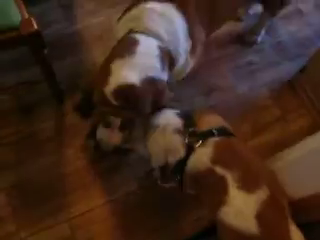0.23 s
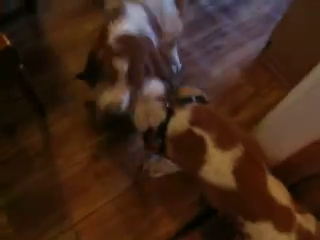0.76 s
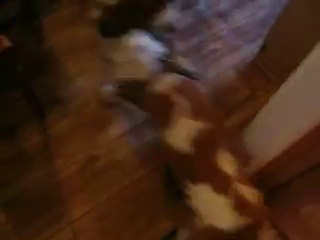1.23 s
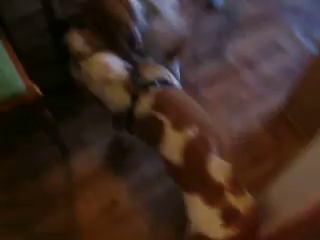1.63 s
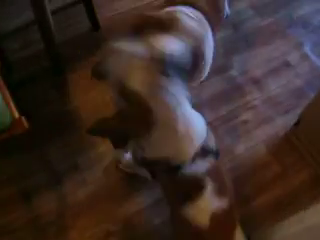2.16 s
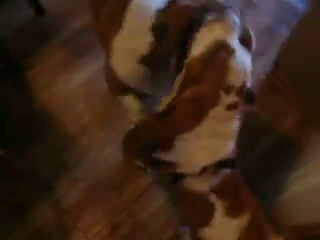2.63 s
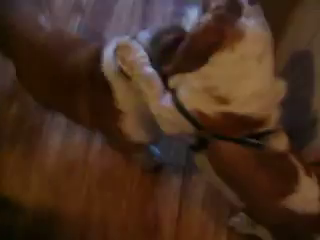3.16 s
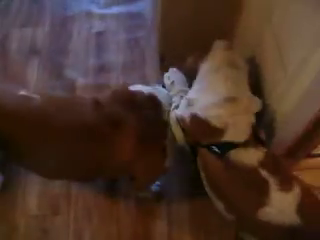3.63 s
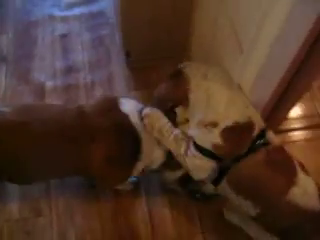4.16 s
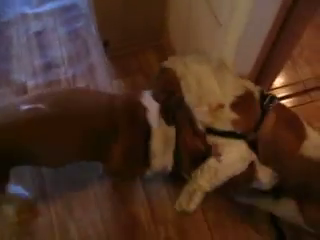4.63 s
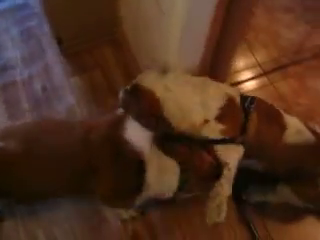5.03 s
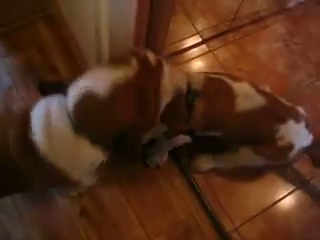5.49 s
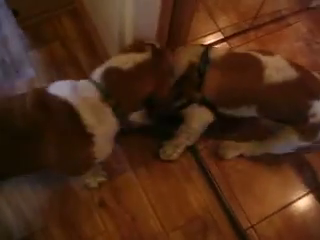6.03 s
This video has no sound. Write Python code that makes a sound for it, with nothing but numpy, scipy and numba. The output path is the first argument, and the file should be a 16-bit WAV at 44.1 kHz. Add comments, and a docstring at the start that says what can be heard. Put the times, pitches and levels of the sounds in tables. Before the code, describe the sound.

Rough, rattling dog growls come in quick bursts, with breathy huffs, sharp snorts, claw ticks and dull thuds in a small room.

```python
"""Growls and grunts in short rough bursts, panting and claw clicks: two large dogs wrestle in a small room.
Voices follow the source-filter principle: uneven pulses and puffs of air excite chest, throat and mouth.
Breath, skids and snorts are filtered noise; grunt onsets, claws and boards are decaying oscillations.
At listed moments the zero line jumps and the room sound ducks, then both creep back.
A dull microphone adds hiss, rounds the peaks and removes the deepest bass and the high treble."""
import sys
import numpy as np
from scipy import signal
from scipy.fft import rfft, irfft, next_fast_len
from scipy.io import wavfile
from scipy.ndimage import uniform_filter1d, map_coordinates
from numba import njit

SR = 44100
rng = np.random.default_rng(int(sys.argv[2]) if len(sys.argv) > 2 else 0)


def int16_out(signal):
    """Quantize to a 16-bit WAV file."""
    q = np.round(np.clip(np.atleast_2d(signal).T, -1, 1) * 32767)
    wavfile.write(sys.argv[1], SR, q.astype(np.int16))


N = 276507  # length in samples

# Effort, one list per growl or grunt. Each row: time in seconds, level in dB, mouth opening as the
# mouth resonance in dB, chest tone in dB; the last two are against the level.
EFFORT = [
    [(0.0, -20.5, 1.5, -2), (0.048, -26, -10.5, -3.5), (0.11, -32, -8.5, -14), (0.12, -32.5, -5, 2)],
    [(0.41, -34, -9.5, -11), (0.426, -20.5, -7, -3.5), (0.452, -15, -7, -3.5), (0.542, -17, -7, -0.5),
     (0.612, -26.5, -11.5, -18), (0.63, -25.5, -4, 2.5)],
    [(1.36, -32, 5, -15), (1.37, -26, -11, -7.5), (1.39, -23.5, 5, -5), (1.432, -19, -1.5, -7.5),
     (1.52, -28.5, -6.5, -13.5)],
    [(1.64, -32, -17, 7), (1.658, -29, -16, -3.5), (1.764, -19.5, -13.5, -0.5), (1.808, -27, -10.5, -7.5),
     (1.972, -19, -16.5, -1), (2.1, -26, -3.5, -11)],
    [(2.135, -26.5, -16, 1), (2.153, -18, -11, -3), (2.197, -22, -24.5, -15), (2.215, -28.5, -10, -1),
     (2.239, -27.5, -13, -14), (2.26, -33, -22, -11)],
    [(2.4, -31, -22, -2), (2.414, -23.5, -16, 0.5), (2.47, -22.5, -21, -7), (2.504, -31, -25, 2.5),
     (2.51, -31.5, -20.5, -8)],
    [(2.62, -27.5, -14, 3), (2.662, -16, -14.5, -8), (2.75, -17.5, -13.5, -1.5), (2.806, -14.5, -6.5, -4),
     (2.914, -23.5, -3.5, -6.5), (2.92, -30, -16, -11)],
    [(2.94, -23.5, -10.5, -11), (2.952, -23, -3, -5.5), (3.05, -20.5, -1.5, -13), (3.092, -21.5, -8, -9.5),
     (3.146, -27.5, -6, -15), (3.17, -30, -11, -3)],
    [(3.345, -30, -5, -7), (3.367, -18, -12, -4.5), (3.447, -13, -18, -3.5), (3.539, -16, -20, 2.5),
     (3.611, -16, -10, -2.5), (3.79, -24, -6.5, -7.5)],
    [(4.1, -29, -29, -4.5), (4.12, -17.5, -12.5, -3), (4.158, -15.5, -2, -9), (4.254, -20.5, -4, -0.5),
     (4.268, -14.5, -17.5, -7.5), (4.34, -29.5, -8, -9.5)],
    [(4.55, -27.5, -18, -10), (4.582, -19, -4, -3.5), (4.656, -16.5, -4.5, -13.5), (4.668, -21, 0, -3),
     (4.744, -18, -5, -8.5), (4.81, -31.5, -6, -5)],
    [(5.01, -26.5, -3, -19), (5.02, -18.5, -9, -10), (5.068, -16, -6, -6), (5.204, -22, -6.5, -8.5),
     (5.224, -22.5, -4.5, -20), (5.25, -30, 7, -11)],
    [(5.475, -28.5, -15, 4), (5.497, -16.5, -39, -4.5), (5.573, -16, -13.5, -4.5),
     (5.605, -12.5, -24.5, -0.5), (5.673, -23, -9, 1.5), (5.73, -20.5, -18.5, -19)],
    [(5.77, -23, -18.5, 3), (5.792, -23.5, -22.5, -4), (5.814, -18, -19, -7), (5.89, -23.5, -29, -9),
     (5.9, -26.5, -24, -9)],
    [(5.92, -25, -14.5, -4), (5.964, -30.5, -31, -1.5), (6.03, -26, -8, -4.5), (6.042, -33, -27, 7),
     (6.078, -24.5, -22.5, -5), (6.13, -29.5, -16.5, -19)],
]
# Voice of each growl, in the order of EFFORT. Each row: fold rate in Hz before breaks and jitter, roughness at
# full effort (0-1), room modes in dB and throat in dB at the reference chest tone, throat in Hz and rasp in dB
# at the reference opening, each named after its centre: the columns run fold rate, roughness, room-mode dB,
# throat dB, throat Hz, mouth Hz, rasp dB, first rasp resonance in Hz, muzzle in Hz; all centres but the mouth's
# then wander.
VOICES = [(84.24, .5, -5.5, -6, 473, 725, -9, 1820, 3700),
          (65.6, .45, -8.5, -4, 400, 990, -16.5, 1840, 4550),
          (68.37, .6, -18, -9, 580, 840, -12.5, 1680, 3760),
          (105.12, .3, -6.5, -5.5, 535, 800, -14.5, 1625, 3600),
          (101.36, .5, -21.5, -2.5, 493, 830, -22, 2600, 4100),
          (84.34, .45, -10, -4.5, 433, 960, -8.5, 690, 1700),
          (104.5, .35, -10.5, -2.5, 490, 802, -17.5, 1700, 4100),
          (102.55, .6, -8.5, -8, 620, 757, -16.5, 2100, 4300),
          (66.26, .22, -6.5, -8.5, 513, 696, -15, 1655, 3370),
          (67.6, 0.2, -6, -3.5, 490, 710, -12.5, 1730, 3713),
          (66.64, 0.9, -14.5, -3.5, 380, 830, -13.5, 1960, 3850),
          (66.7, .3, -4.5, -7.5, 568, 800, -19.5, 1900, 4700),
          (105.8, .22, -17, -5, 486.5, 890, -16, 1757, 3720),
          (67.06, .45, -10.5, -4, 466, 980, -15, 2400, 3540),
          (104.8, .4, -3.5, -6, 473, 1300, -15, 3300, 2600)]
# Low resonances of chest and room. Each row: centre in Hz, width in Hz, relative gain in dB.
CHEST = [(66.3, 20, 3.5), (106.4, 143, 6.5), (163, 200, 2)]
# Low modes of the small room that colour the voices. Each row: centre in Hz, width in Hz, relative gain in dB.
ROOM_MODES = [(195, 26, -1), (258, 30, 4), (345, 59, -1)]
# Upper resonances. Each row: centre as a multiple of the first rasp resonance, width of the first
# filter pass in Hz, mean gain in dB.
RASP = [(1.002, 133, 15), (1.361, 163.3, 12), (1.759, 252, 9), (2.399, 2510, 11.5)]
OPENING_REF_DB, RASP_DB_PER_DB, THROAT_HZ_PER_DB = -7, 0.32, 5  # opening brings rasp and a higher throat
CHEST_REF_DB, THROAT_YIELDS = -9, 0.27  # dB of throat and room modes lost per dB of chest tone over the reference
ROUGH_PER_DB = .02  # the folds slap less evenly below full effort
MUZZLE_DB = -13  # mean level of a narrow muzzle resonance, against the rasp
WANDER = .065  # tongue and jaw shift the resonances by about this share


def growls():
    """Source-filter principle: uneven fold slaps and puffs of air excite chest, throat and mouth, coloured by
    room modes."""
    gate, level_db, mouth_db, chest_db = curves(EFFORT)
    (hz, rough, modes_db, throat_db, throat_hz, mouth_hz,
     rasp_db, rasp_hz, muzzle_hz) = each(VOICES, EFFORT)
    full_db, = each([[np.max(table, axis=0)[1]] for table in EFFORT], EFFORT)
    rough = np.clip(rough + ROUGH_PER_DB * (full_db - level_db), .1, .8)

    opening = mouth_db - OPENING_REF_DB
    rasp_db = rasp_db + RASP_DB_PER_DB * opening
    yielded_db = THROAT_YIELDS * (chest_db - CHEST_REF_DB)
    throat_db = throat_db - yielded_db
    modes_db = modes_db - yielded_db
    throat_hz = throat_hz + THROAT_HZ_PER_DB * opening
    throat_hz, rasp_hz, muzzle_hz = [
        centre * (1 + WANDER * wobble(9)) for centre in (throat_hz, rasp_hz, muzzle_hz)]

    cycles = np.cumsum(fold_rate(hz) * (1 + .13 * rough * wobble(90))) / SR
    # slaps differ in size, and every second one tends to be weaker
    alternation = (-1) ** np.floor(cycles)
    slap_db = 7 * rough * wobble(110) + 4 * rough * alternation
    slaps = np.diff(np.floor(cycles), prepend=0) * amp(slap_db)
    # air rushes hardest once a cycle
    rush = .5 + np.exp(-3 * (cycles % 1))
    puffs = steady(rush * amp(2 * wobble(120)) * rng.standard_normal(N))
    source = np.sqrt(1 - rough) * steady(slaps) + np.sqrt(rough) * puffs

    sway = 7 * (1 - rough) ** 3 * np.cos(2 * np.pi * cycles)  # the chest wall follows even folds
    rumble = steady(filtered(source, lambda f: resonances(CHEST)(f) / (1 + 1j * f / 150) ** 2))
    chest = steady(rumble + sway)
    modal = steady(filtered(source, lambda f: resonances(ROOM_MODES)(f) / (1 + 1j * f / 300) ** 2))
    throat = cavity(source, throat_hz, width_hz=165)
    mouth = cavity(source, mouth_hz, width_hz=170)

    hiss = 0.41 * source + puffs
    muzzle = amp(MUZZLE_DB + 4 * wobble(30)) * cavity(hiss, muzzle_hz, width_hz=380)
    # tongue and lips move, so each upper resonance flickers on its own
    upper = sum(amp(db + 1.8 * wobble(30)) * cavity(hiss, multiple * rasp_hz, width)
                for multiple, width, db in RASP)
    rasp = muzzle + steady(upper)
    voice = (amp(chest_db) * chest + amp(modes_db) * modal + amp(throat_db) * throat
             + amp(mouth_db) * mouth + amp(rasp_db) * rasp)
    return gate * amp(level_db) * voice


# Shifts of the voice in mid growl. Each row: time in seconds, shift in Hz, half-width of the glide in seconds.
BREAKS = [(1.852, -18, .04), (2.815, -17, .02), (3.44, 36, 0.0042), (3.55, -8, 0.035), (5.57, -8, 0.044)]


def fold_rate(hz):
    """Register break: the fold rate glides to a shifted value and stays there until the next growl."""
    t = np.arange(N) / SR
    for s, shift_hz, width in BREAKS:
        end = min(table[0][0] for table in EFFORT if table[0][0] > s) - .01
        hz = hz + shift_hz * (t < end) * (1 + np.tanh((t - s) / width)) / 2
    return hz


# Hard slaps in the grunts. Each row: start in seconds, level in dB before the onset ramp, ring in Hz.
BURSTS = [(1.373, -12.5, 940), (1.699, -14, 573), (2.151, -7.5, 582), (2.416, -10, 408), (2.666, -11, 506),
          (2.742, -12, 548), (3.45, -8, 674), (4.961, -13, 475), (5.023, -2.5, 898), (5.114, -7, 842),
          (5.798, -7.5, 484)]


def bursts():
    """Impulse response: the closed throat springs open and one strong push rings the mouth briefly."""
    out, t = np.zeros(N + SR), np.arange(SR // 20) / SR
    for s, db, hz in BURSTS:
        decay = amp(db - 60 * t / .04)
        onset = 1 - np.exp(-t / .001)
        out[round(s * SR):][:len(t)] += decay * onset * np.sin(2 * np.pi * hz * t)
    return out[:N]


# Spells of panting and skidding, one list each. Each row: time in seconds, breath in dB, skid in dB.
PANTS = [
    [(0.11, -38, -46), (0.148, -43, -56), (0.206, -47, -58), (0.33, -38.5, -33.5), (0.35, -56, -45),
     (0.42, -41, -34)],
    [(0.62, -28, -31.5), (0.772, -46.5, -42), (0.798, -18, -28.5), (0.814, -15.5, -34.5),
     (0.834, -18.5, -24), (0.84, -47, -42.5)],
    [(0.84, -38.5, -38.5), (0.848, -60.5, -61.5), (0.906, -38, -62), (1.07, -44, -64), (1.08, -45, -44),
     (1.09, -34.5, -60.5)],
    [(1.09, -35, -61), (1.152, -34.5, -34.5), (1.226, -26.5, -34), (1.294, -46, -41), (1.362, -50, -41.5),
     (1.37, -33, -41.5)],
    [(1.51, -27.5, -32), (1.556, -37.5, -43), (1.586, -36, -51), (1.596, -42.5, -43.5), (1.626, -36, -51),
     (1.65, -37.5, -35.5)],
    [(2.09, -48, -37), (2.108, -45.5, -41), (2.132, -33.5, -43.5), (2.14, -27.5, -47)],
    [(2.25, -35, -50), (2.264, -38, -61), (2.312, -39.5, -58), (2.32, -33, -38), (2.354, -46, -63),
     (2.41, -46, -35.5)],
    [(2.5, -36, -60), (2.516, -47, -61), (2.524, -26, -41), (2.532, -28.5, -33), (2.62, -46, -46.5),
     (2.63, -28, -40)],
    [(3.16, -39, -40.5), (3.206, -37, -46), (3.26, -49, -55.5), (3.29, -30.5, -41.5), (3.342, -39.5, -55),
     (3.35, -33, -44)],
    [(3.78, -35.5, -36), (3.888, -39.5, -58), (3.946, -45, -41), (4.038, -63.5, -59.5),
     (4.098, -55.5, -40.5), (4.11, -41, -48)],
    [(4.33, -30.5, -37.5), (4.402, -37, -51.5), (4.462, -38.5, -32.5), (4.476, -31, -32.5),
     (4.542, -25, -32.5), (4.56, -36.5, -33)],
    [(4.8, -29, -42.5), (4.872, -39, -51), (4.892, -25, -33.5), (4.946, -52, -47), (4.958, -23.5, -32),
     (5.02, -29.5, -46.5)],
    [(5.24, -33.5, -31.5), (5.29, -30.5, -43.5), (5.322, -25.5, -38.5), (5.35, -31.5, -45),
     (5.47, -37, -45.5), (5.48, -32, -45.5)],
    [(5.72, -34, -43), (5.758, -34.5, -48.5), (5.762, -35.5, -45), (5.78, -42, -44)],
    [(6.12, -39, -47.5), (6.178, -41, -52), (6.196, -38, -39), (6.202, -31, -60), (6.21, -36, -48),
     (6.27, -35, -46)],
]
# Colour of each spell, in the same order. Each row: thud in dB against the breath, mouth in Hz
# at a breath of -32 dB, skid in Hz.
SPELLS = [(2, 920, 1600), (-4, 740, 1500), (-19, 900, 2200), (-13.5, 855, 1570), (-6, 700, 2440),
          (-12, 760, 1900), (-3.5, 650, 2400), (-4, 710, 2800), (-4.5, 570, 1600), (3, 650, 2360),
          (-6, 690, 1800), (-1, 590, 2300), (-9, 660, 630), (-6, 500, 850), (0, 530, 1540)]
PANT_HZ_PER_DB = 9.5  # a harder breath opens the mouth wider


def pants():
    """Turbulence and friction: fluttering breath through the mouth, paws skidding in grains, body thuds."""
    gate, breath_db, skid_db = curves(PANTS)
    thud_db, mouth_hz, skid_hz = each(SPELLS, PANTS)
    mouth_hz = mouth_hz + PANT_HZ_PER_DB * (breath_db + 32)
    air = amp(3 * wobble(60)) * rng.standard_normal(N)
    grit = amp(3 * wobble(35) + 4 * wobble(600)) * rng.standard_normal(N)
    thud = steady(filtered(rng.standard_normal(N), resonances(CHEST + ROOM_MODES)))
    breath = cavity(air, mouth_hz, width_hz=234)
    skid = cavity(grit, skid_hz, width_hz=1600)
    return gate * (amp(breath_db) * (amp(thud_db) * thud + breath) + amp(skid_db) * skid)


# Snorts and scrapes that start at once and die away. Each row: start in seconds,
# level in dB (6 dB above the initial rms), centre in Hz, t60 in seconds.
SNORTS = [(0.62, -23.5, 2950, 0.3), (1.685, -25.5, 2900, 0.53), (1.7823, -13, 4660, 0.29),
          (2.0194, -13, 4840, 0.35), (2.5255, -24.5, 2790, 0.44), (4.2333, -18.5, 2500, 0.2),
          (5.8055, -26, 4570, 0.58)]


def snorts():
    """Exponential decay of turbulence: grainy broad hiss starts at once and fades."""
    t, level, hz = np.arange(N) / SR, np.zeros(N), np.full(N, 4000.)
    for s, db, centre_hz, t60 in SNORTS:
        level += (t > s) * amp(db - 6 - 60 * np.abs(t - s) / t60)
        hz[t > s] = centre_hz
    grains = amp(1.2 * wobble(130)) * rng.standard_normal(N)
    return level * cavity(grains, hz, width_hz=6600)


# Claws on the floor. Each row: start in seconds, tick in dB, ring in Hz, knock in dB against the tick.
CLAWS = [(0.24, -29.5, 2180, 1.5), (0.4312, -25, 2410, 0), (0.5232, -19, 2516, -2.5),
         (0.619, -20, 2165, -15), (0.7291, -25, 2450, 1), (0.8292, -10, 3027, -8),
         (1.2188, -19.5, 2455, -11), (1.689, -26.5, 2830, -5.5), (1.7585, -12, 3700, -19),
         (1.7852, -5.5, 5050, -20), (2.0205, -20.5, 2204, -0.5), (2.3195, -29, 3080, 1.5),
         (2.4516, -22, 3580, -17), (2.524, -33.5, 2770, -11), (2.9032, -16.5, 2344, 2.5),
         (2.9466, -13.5, 2885, -18), (3.0017, -24, 2530, 3), (3.0485, -16.5, 2280, 6.5),
         (3.1102, -19.5, 2590, 2), (3.1275, -15.5, 2214, -10), (3.693, -11, 2410, -24.5),
         (4.074, -26, 4100, -19.5), (4.4389, -26.5, 2540, -7), (4.6977, -14.5, 2900, 0),
         (4.8877, -21, 2820, -9), (4.9532, -25, 2450, -10), (4.9671, -19, 2580, -13),
         (5.2121, -19.5, 4000, -11), (5.3042, -35, 2650, -16), (5.4508, -28.5, 3000, -15),
         (5.5708, -24, 2325, -10), (5.6473, -21, 2400, -13), (5.6765, -24, 2386, -21),
         (5.8054, -21, 4530, -14), (6.0319, -20.5, 2600, -23), (6.2132, -28, 2540, -16),
         (6.2342, -26.5, 2560, -24)]
BOARD_HZ = 1242


def claws():
    """Impact excitation: each claw gives a short ringing tick with a noisy crack and knocks the board."""
    out, t = np.zeros(N + SR), np.arange(SR // 25) / SR
    for s, db, hz, knock_db in CLAWS:
        scatter = np.cumsum(rng.normal(0, .2, len(t)))  # random phase: the ring is not pure
        tick = amp(-60 * t / .016) * np.sin(2 * np.pi * hz * t + scatter)
        crack = amp(-6 - 60 * t / .008) * rng.standard_normal(len(t))
        knock = amp(knock_db - 60 * t / .03) * np.sin(2 * np.pi * BOARD_HZ * t + scatter / 4)
        out[round(s * SR):][:len(t)] += amp(db) * (tick + knock + crack)
    return out[:N]


# Decay of the room. Each row: frequency in Hz, t60 in seconds.
ROOM = [(100, .22), (800, .27), (5000, .15)]


def room(x):
    """Reverberation by convolution: each frequency of a noise tail dies at its own speed."""
    hz, t, z = signal.stft(rng.standard_normal(SR // 2), SR, nperseg=256)
    t60 = along(ROOM, hz)[:, None]
    tail = signal.istft(z * amp(-60 * t / t60), SR, nperseg=256)[1]
    late = np.pad(x, (250, 0))  # delay in samples
    return signal.fftconvolve(late, tail / np.linalg.norm(tail))[:N]


# Spectrum of the room noise. Each row: frequency in Hz, relative density in dB per Hz.
AIR = [(18, -31.5), (30, -8.5), (49, -35), (295, -5), (656, -3), (935, -6.5), (1390, -23), (3870, -30.5),
       (5280, -24.5), (6030, -25.5), (7840, -83), (13300, -120)]


def room_noise():
    """Spectral shaping: white noise takes the colour of the room, at a running rms of 1."""
    return steady(filtered(rng.standard_normal(N), lambda hz: amp(along(AIR, hz))), span=0.77)


# Jumps of the zero line. Each row: time in seconds, height in full-scale units.
JUMPS = [(0, 0.033), (0.481, 0.014), (0.83, 0.083), (1.788, 0.035), (2.907, 0.023), (3.051, 0.029),
         (3.462, 0.051), (3.7, 0.015), (4.138, 0.013), (5.028, 0.038), (5.605, 0.036)]


def zero_line(creep=0.094):
    """Linear relaxation: the zero line jumps, then creeps back at a steady speed per second."""
    t = np.arange(N) / SR
    height = np.max([(t >= s) * np.maximum(h - creep * (t - s), 0) for s, h in JUMPS], axis=0)
    return uniform_filter1d(height, size=90)


def amp(db):
    """Decibel definition: the amplitude ratio of a level in dB."""
    return 10 ** (np.asarray(db) / 20)


def steady(x, span=.07):
    """Normalisation: x at a running rms of 1 over span seconds."""
    return x / np.sqrt(np.abs(uniform_filter1d(x ** 2, int(span * SR))) + 1e-12)


def along(points, hz):
    """Logarithmic frequency scale: (Hz, value) points joined on a log axis."""
    f, v = np.transpose(points)
    return np.interp(np.log(hz + 1), np.log(f + 1), v)


def curves(tables, fade=.012):
    """Piecewise-linear envelopes: a gate open inside each table, then a curve for each column."""
    t = np.arange(N) / SR
    s, *cols = np.transpose(np.concatenate(tables))
    gate = sum(np.clip(np.minimum(t - rows[0][0], rows[-1][0] - t) / fade + .5, 0, 1)
               for rows in tables)
    return [np.minimum(gate, 1)] + [np.interp(t, s, c) for c in cols]


def each(rows, tables):
    """Sample and hold: each column of row k holds from just before the start of table k."""
    starts = [table[0][0] - .01 for table in tables]
    index = np.searchsorted(starts, np.arange(N) / SR) - 1
    return np.array(rows)[np.maximum(index, 0)].T


def wobble(rate):
    """Band-limited fluctuation: a smooth random curve with rate knots a second."""
    knots = rng.standard_normal(int(N * rate / SR) + 4)
    return map_coordinates(knots, [np.arange(N) * rate / SR])


def filtered(x, response):
    """Linear filtering: the spectrum of x times a complex response of frequency."""
    m = next_fast_len(N + SR // 2)
    return irfft(rfft(x, m) * response(np.fft.rfftfreq(m, 1 / SR)), m)[..., :N]


def resonances(modes):
    """Modal superposition: the causal response of a row of resonances with alternating signs."""
    def response(f):
        return sum((-1) ** k * amp(db) * 1j * f * w / (c * c - f * f + 1j * f * w)
                   for k, (c, w, db) in enumerate(modes))
    return response


@njit
def ring(x, turn, pole):
    """Two-pole resonance: a band-pass whose centre moves sample by sample."""
    y = np.zeros(len(x))
    for i in range(2, len(x)):
        drive = x[i] - x[i - 2]
        y[i] = drive + 2 * pole * np.cos(turn[i]) * y[i - 1] - pole * pole * y[i - 2]
    return y


def cavity(x, hz, width_hz):
    """Cavity resonance: two moving passes, the second 2.5 times as wide, give steep flanks at steady level."""
    turn, pole = 2 * np.pi * hz / SR, np.exp(-np.pi * width_hz / SR)
    return steady(ring(ring(x, turn, pole), turn, pole ** 2.5))


def scene():
    """Superposition: the direct sound of the dogs, then the room's reply and noise, which duck together."""
    dogs = growls() + bursts() + pants() + snorts() + claws()
    duck = np.clip(1 - zero_line() / 0.11, .05, 1)  # the higher the zero line, the quieter the room
    background = amp(-9) * room(dogs) + amp(-37.0) * room_noise()
    return (dogs + duck * background)[None]


# Treble loss of the microphone. Each row: frequency in Hz, gain in dB.
MIC = [(4200, 0), (5200, -6), (5800, -19), (6180, -34)]
TOP_HZ = 6180  # nothing passes from here up


def record(dry):
    """Transducer limits: bass cut, hiss, saturation of peaks, a wandering zero line and a band limit."""
    bass_cut = filtered(dry, lambda hz: -hz * hz / (55 ** 2 - hz * hz + 1.3j * hz * 55))
    heard = bass_cut + amp(-42.5) * rng.standard_normal(dry.shape)
    rounded = heard / (1 + np.abs(heard / .53) ** 6) ** (1 / 6)
    shifted = rounded + zero_line() - .021
    return filtered(shifted, lambda hz: amp(along(MIC, hz)) * (hz < TOP_HZ))


dry = scene()
out = record(dry)
int16_out(out)
```